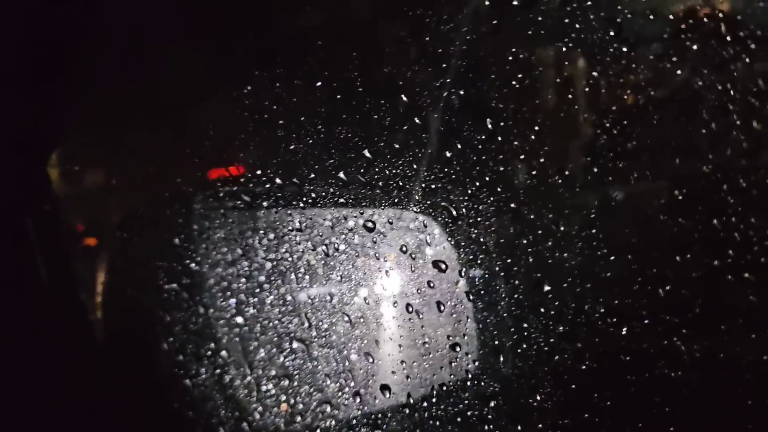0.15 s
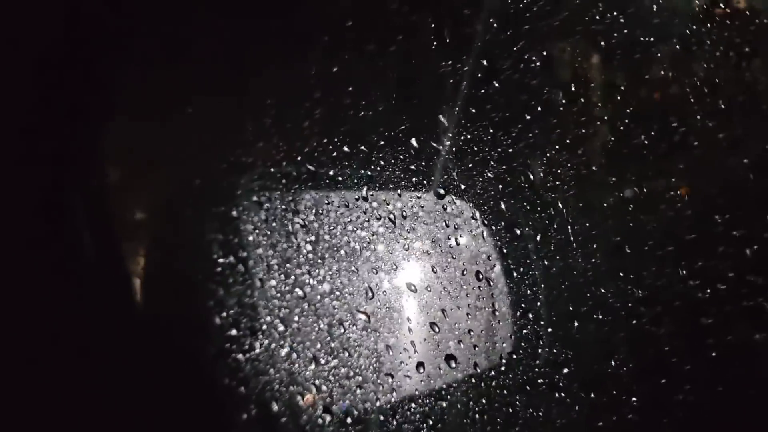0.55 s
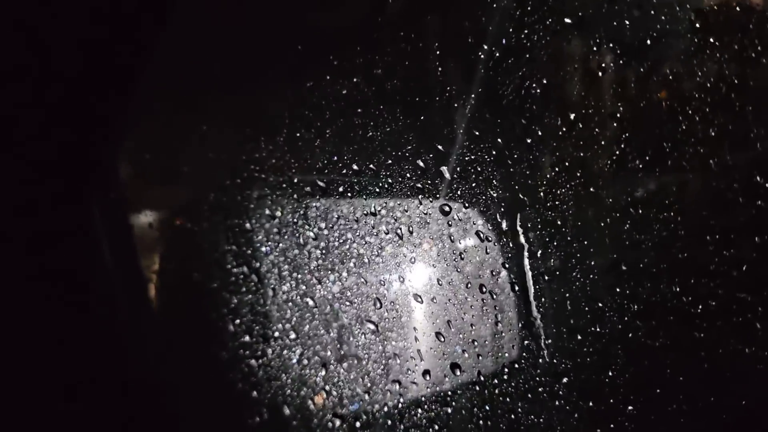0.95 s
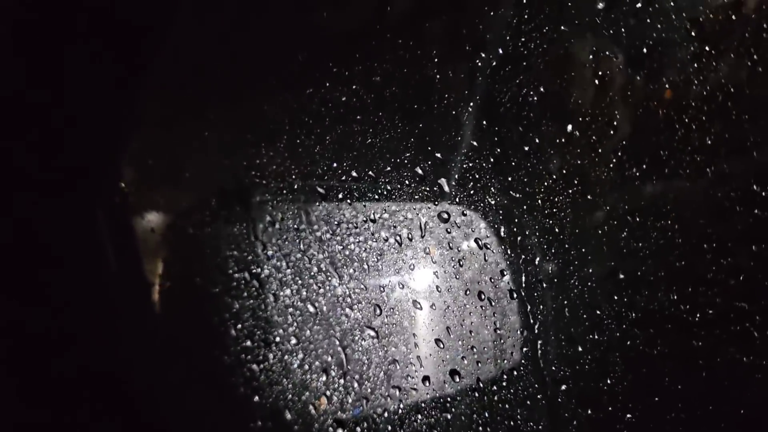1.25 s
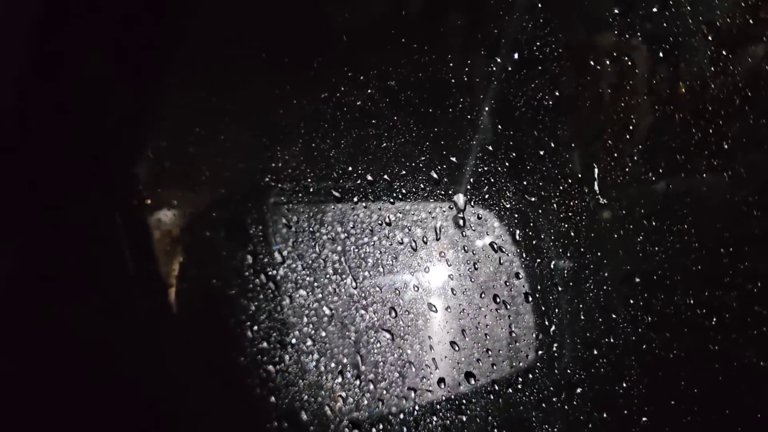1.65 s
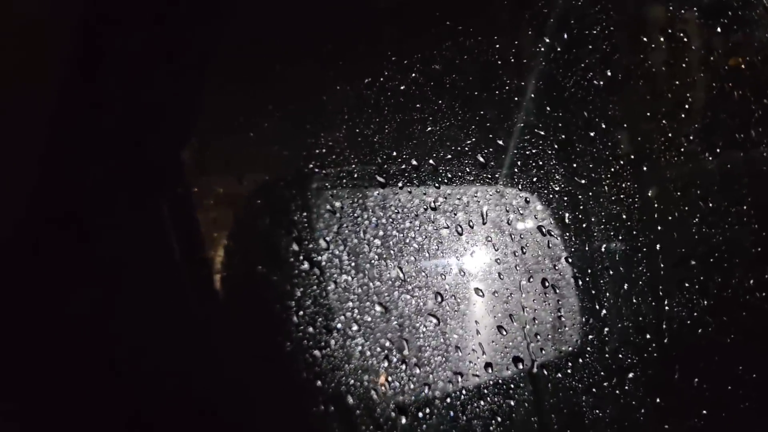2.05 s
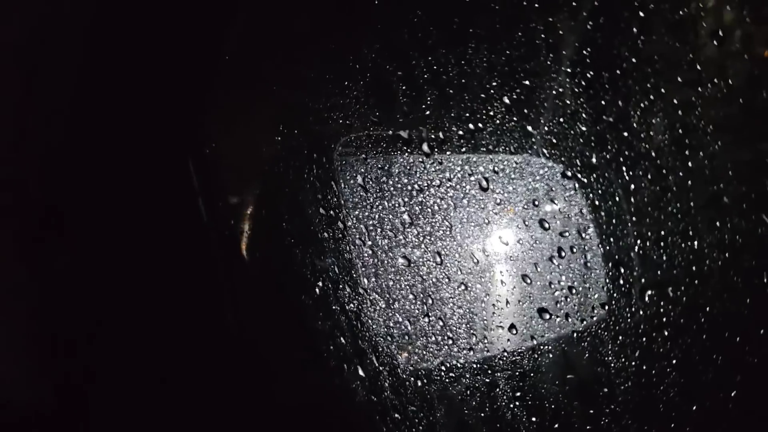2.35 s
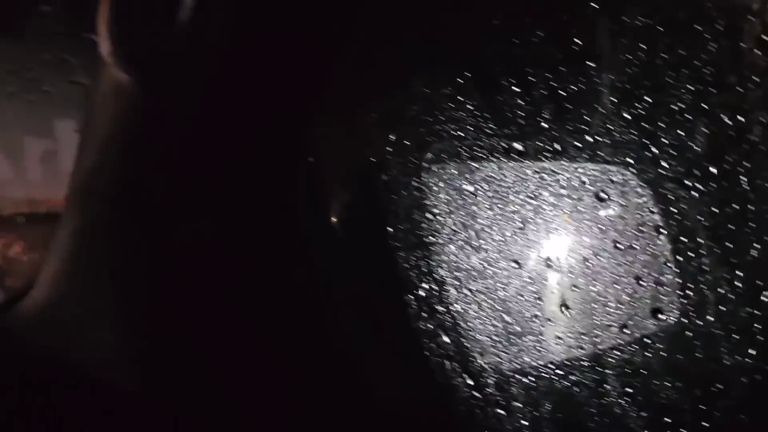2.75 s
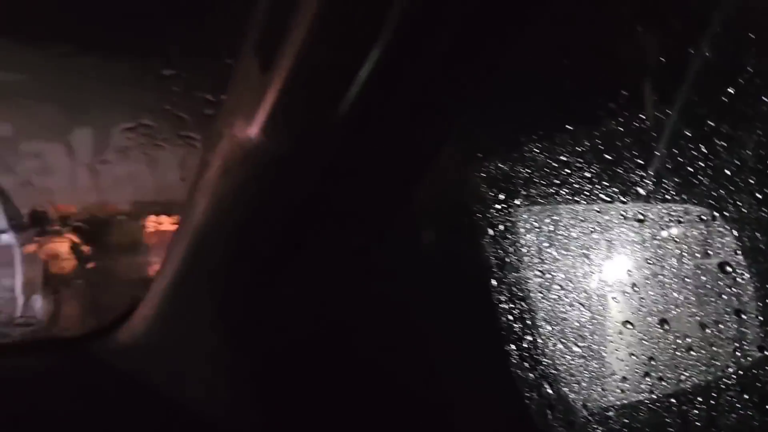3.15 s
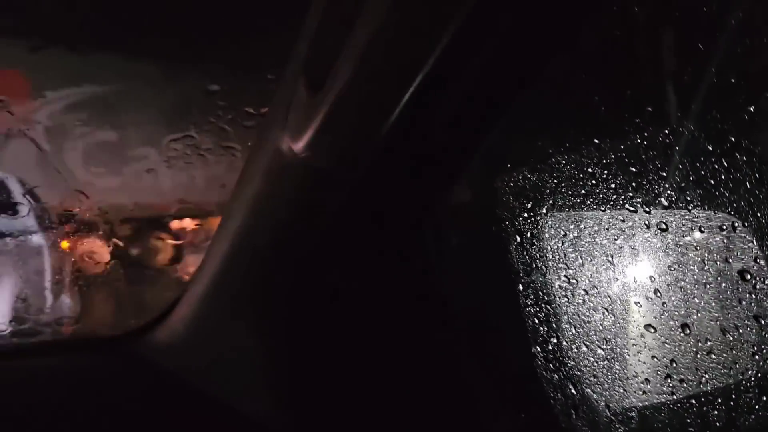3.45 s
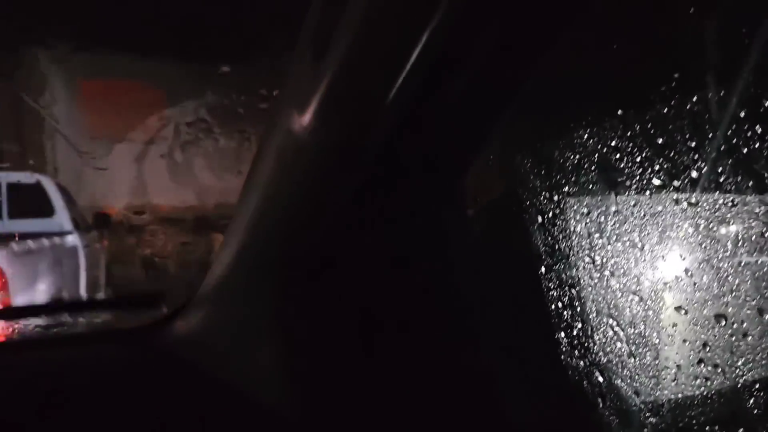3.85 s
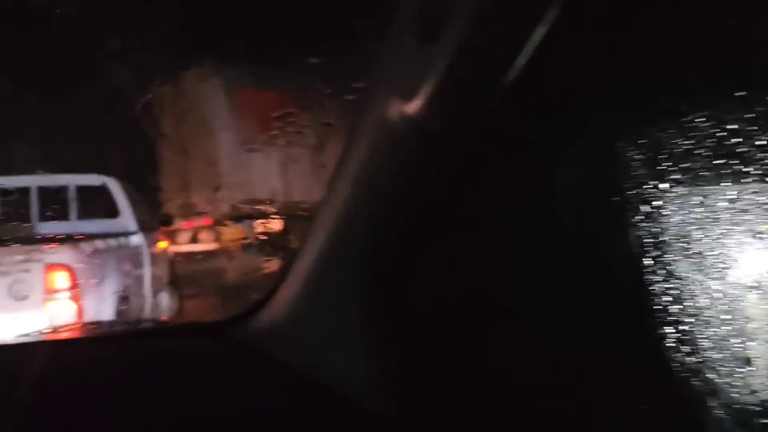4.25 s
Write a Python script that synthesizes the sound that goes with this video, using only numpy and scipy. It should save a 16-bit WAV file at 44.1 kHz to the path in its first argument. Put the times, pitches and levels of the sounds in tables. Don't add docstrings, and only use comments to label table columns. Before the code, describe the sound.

Inside a slow car in rain, heard close through a phone's two microphones. A dense, dull wash of drops runs throughout, mostly low and middle tones with little treble; the right side has more hollow metallic door pings, the left slightly brighter glass ticks and spray. Beneath lie deep tyre rumble, soft floor thuds and a low steady engine hum. At 0.2-0.35 s a faint wet rubber squeak stutters on the left. The low body rumble dips briefly near 0.9 s; a thud lands at 1.2 s. At 2.1 s there is a tiny click from lost samples, then a lorry's very low exhaust boom swells around 2.2, 2.7, 2.9, 3.15, loudest at 3.35, then 3.55 and 3.9 s, with droning floor resonances. Rain is heaviest about 3.25 s, with crowded pings until the end at 4.4 s. Small plopping drips occur near 2.1, 2.4, 2.7, 3.8 and 4.15 s.

```python
import sys
import numpy as np
from scipy import signal
from scipy.fft import rfft, irfft, next_fast_len
from scipy.io import wavfile
from scipy.ndimage import uniform_filter1d, minimum_filter1d

SR = 44100
rng = np.random.default_rng(int(sys.argv[2]) if len(sys.argv) > 2 else 0)


def volts_from_db(level):
    exponent = np.asarray(level, float) / 20
    return 10 ** exponent


def store_pcm(level_fs):
    pcm = np.round(np.clip(level_fs, -1, 1) * 32767).astype(np.int16)
    wavfile.write(sys.argv[1], SR, np.atleast_2d(pcm).T)


N = 194098
T = np.arange(N) / SR

# frequency_hz, left_db, right_db, shared_fraction (0-1)
PORT_SPECTRUM = [(199, -53.5, -52.5, 0.91), (387, -57, -54.5, 0.44), (792, -59.5, -58.5, 0.53),
                 (947, -58, -48.5, 0.24), (1280, -60, -45.5, 0.49), (1500, -61, -54, 0.24),
                 (2024, -66, -65, 0.4), (2330, -69.5, -73.5, .2), (3440, -70.5, -82, 0.3),
                 (4350, -75, -100.5, 0), (4680, -76, -100, 0), (5470, -86.5, -112, 0.6),
                 (7840, -104, -119, 0), (8100, -135, -135, .2)]
PORT_LAG_SAMPLES = 27
# time_s, level_db (relative)
RAIN_INTENSITY = [
    (0.0, -0.5),
    (0.55, 0),
    (1.3, 0.5),
    (1.65, 0),
    (2.45, 0.5),
    (3.25, 4),
    (3.62, 2),
    (3.85, 3),
    (4.15, 1.5),
    (4.4, 3),
]
ROOF_DB, PANEL_DB, GLASS_DB, SPRAY_DB = -1, -3.5, -1.74, -9
ROOF_SLOPE, PANEL_SLOPE, GLASS_SLOPE, SPRAY_SLOPE = 0.12, 0.56, 0.11, 0.44
SPRAY_PATCH_DB, SPRAY_PATCHES_PER_S = 1.6, 18
# peak_s, level_db
WATER_SHEETS = [(0.022, 3), (0.06, -3.5), (0.105, -0.5), (0.32, 4.5), (0.355, -1), (0.905, 3), (0.968, -5),
                (1.5, 4), (1.59, 2.5), (1.624, 1), (1.69, 7), (1.95, 6.5), (1.98, -1.5), (2.019, 5),
                (2.06, 3), (2.09, 5), (2.34, 3), (2.47, 7), (2.51, -2), (3.165, 3.5), (3.22, 4.5),
                (3.28, 3), (3.12, 1.5), (3.33, 2), (4.1, -5), (4.34, -5.5), (4.395, 2.5)]
SHEET_RISE_S, SHEET_FALL_S = 0.014, 0.013
# peak_s, level_db
PANEL_BURSTS = [(0.04, 2.5), (0.76, 5.5), (0.92, -1), (3.242, -3.5), (1.68, 5.5), (2.52, -1), (2.72, 0),
                (2.775, -4), (2.82, 1), (3.165, 3), (3.239, 8.5), (3.255, -2), (3.31, 2.5), (3.475, 0.5),
                (3.5, -2), (3.535, 0), (3.8, -1), (3.925, -1), (4.33, 1)]
BURST_RISE_S, BURST_FALL_S = 0.038, 0.019

# frequency_hz, density_db (per Hz)
ROAD_SPECTRUM = [(11, -22), (18, 3), (41, 4.5), (70, -11.5), (133, -3.5), (181, -8.5), (215, -12.5),
                 (338, -30), (375, -14.5), (400, -31), (520, -43), (880, -120)]
# centre_s, level_db, length_s
TARMAC_PATCHES = [(0.0, 0, 0.057), (0.5, 3.5, 0.11), (0.76, -1, 0.11), (0.894, 2.5, 0.029),
                  (0.975, -8, 0.023), (1.04, 5, 0.025), (1.193, 2.5, 0.062), (1.828, -7, 0.07),
                  (1.896, 3, .03), (1.996, -10, 0.037), (2.135, 3, 0.23), (2.697, 2.5, 0.11),
                  (2.967, 3.5, 0.049), (3.133, -8, 0.042), (3.237, 5, 0.12), (3.56, -9, 0.04),
                  (3.755, -6.5, 0.026), (3.91, -2, 0.077), (3.998, -4.5, 0.028), (4.14, -2.5, 0.042),
                  (4.4, 3, 0.11)]
# peak_s, level_db, pitch_hz
FLOOR_THUDS = [(0.03, -26, 137), (0.04, -26.5, 88.4), (0.13, -23, 126.5), (0.26, -26, 151.7),
               (0.37, -27.5, 78), (0.46, -29.5, 170), (0.48, -40, 245), (0.53, -23.5, 135),
               (0.72, -29.5, 170), (0.89, -26, 186.7), (1.06, -27, 122.5), (1.08, -31, 77.5),
               (1.12, -27.5, 167), (1.2, -20, 86.6), (1.34, -28, 152), (1.49, -26.5, 177), (1.6, -31, 175),
               (1.75, -29, 143), (1.89, -25, 133.4), (2.05, -26, 157), (2.11, -28, 114), (2.28, -28, 111),
               (2.53, -28, 114.5), (2.65, -26.5, 180.7), (2.68, -28.5, 144), (3.24, -28, 167),
               (3.8, -27, 196), (3.92, -26.5, 174.3), (4.24, -25.5, 184), (2.2, -26, 155), (2.1, -30, 123),
               (2.71, -26, 98.4), (2.97, -24.5, 96.4), (3.32, -17.5, 99), (3.1, -32, 191)]
# centre_s, level_db, length_s
SPRING_LULLS = [
    (0.866, -14, 0.21),
]
TYRES_DB = -26
SPRINGS_DB, SPRINGS_AFTER_DB, SETTLE_DB_PER_S = -24, -29.5, 3
JOLT_S, LORRY_NEAR_S = 0.9, 2.1

ENGINE_HZ, ENGINE_DB = 31.16, -27
# multiple of ENGINE_HZ, level_db
ENGINE_ORDERS = [(1, -1.5), (2, -7), (5, -17), (6, -15)]

# peak_s, level_db, pitch_hz
DOOR_RINGS = [(0.016, -26.5, 1130), (0.034, -19.5, 1174), (0.77, -24, 1250), (1.013, -19.5, 1250),
              (1.591, -18, 1176), (1.625, -20.5, 1290), (1.678, -16.5, 1264), (1.733, -19.5, 1147),
              (2.013, -25, 1134), (2.255, -27, 1470), (2.286, -20.5, 1154), (2.345, -24, 1220),
              (2.476, -27, 943), (2.637, -27, 1320), (2.637, -22, 930), (2.659, -22, 1170),
              (2.681, -26, 1207), (2.709, -27, 1305), (2.821, -29, 1450), (2.824, -21.5, 1006),
              (2.979, -29, 1039), (3.016, -21, 1180), (3.029, -20, 957), (3.11, -28, 1020),
              (3.159, -33, 1180), (3.172, -26, 1470), (3.187, -18, 1256), (3.231, -24, 1000),
              (3.253, -18.5, 1394), (3.302, -22, 987), (3.309, -20, 1315), (3.318, -34, 1160),
              (3.349, -23, 1250), (3.423, -25, 1160), (3.464, -27, 1130), (3.479, -19.5, 1284),
              (3.479, -22, 986), (3.529, -24.5, 984), (3.532, -22, 1280), (3.585, -21, 1280),
              (3.585, -31, 1110), (3.753, -29, 980), (3.759, -26, 1380), (3.799, -22.5, 973),
              (3.799, -19.5, 1250), (3.837, -26, 1000), (3.914, -19.5, 1173), (3.93, -20, 980),
              (3.93, -27, 1325), (3.939, -29, 1170), (4.063, -22, 995), (4.085, -19.5, 1275),
              (4.132, -17.5, 1224), (4.188, -24.5, 996), (4.225, -20, 1036), (4.312, -14.5, 1286),
              (4.337, -27, 954), (4.34, -21.5, 1270), (4.374, -30, 1286)]
DOOR_RINGS_MORE = [(0.292, -27, 1430), (0.304, -30, 1540), (0.345, -23.5, 1340), (0.345, -27, 1196),
                   (0.413, -26, 1490), (0.537, -27.5, 1306), (0.659, -23.5, 1455), (0.885, -22, 1170),
                   (0.898, -24.5, 1450), (0.91, -24, 1090), (1.177, -25, 1320), (1.236, -25, 896),
                   (1.404, -24, 1110), (1.476, -23, 1270), (1.494, -23, 1150), (1.541, -20.5, 1110),
                   (1.709, -22.5, 1394), (1.789, -28, 1210), (1.83, -27, 1265), (1.886, -23, 1306),
                   (1.951, -33.1, 1620), (1.954, -30.5, 1470), (2.053, -35, 1140), (2.255, -26, 1380),
                   (2.258, -22, 1040), (2.398, -26, 1470), (2.436, -24.5, 1340), (2.473, -27, 1500),
                   (2.606, -28.5, 1460), (2.793, -29.5, 1200), (2.824, -29, 1690), (2.864, -29, 1580),
                   (2.933, -32, 1270), (3.178, -23.5, 990), (3.194, -28, 1120), (3.231, -33.5, 1134),
                   (3.299, -33, 1510), (3.395, -32, 1100), (3.405, -28, 945), (3.427, -24, 910),
                   (3.541, -28, 1300), (3.557, -24, 1280), (3.594, -37, 1370), (3.597, -26, 980),
                   (3.653, -27, 995), (3.709, -24, 1005), (3.743, -26, 1180), (3.812, -24, 1406),
                   (3.843, -29.5, 1420), (3.924, -34, 1670), (4.004, -32, 1764), (4.026, -21, 1225),
                   (4.166, -22.5, 950), (4.169, -29, 1220), (4.203, -32, 1500), (4.228, -22.5, 1420),
                   (4.25, -22, 1280), (4.259, -25, 1160), (4.349, -29, 1440), (4.359, -37, 1117)]
DOOR_LEFT_DB, RING_RISE_S, RING_FALL_S = -20, 0.007, 0.0099
# peak_s, level_db,
# pitch_hz
ROOF_KNOCKS = [(0.052, -25.5, 393), (0.34, -30, 283), (0.625, -30, 580), (0.636, -31, 324), (0.7, -29, 480),
               (0.902, -28, 383), (1.171, -27.5, 408), (1.194, -26.5, 283), (1.695, -29.5, 290),
               (2.054, -29, 287), (2.073, -33, 406), (2.178, -30.5, 358), (2.222, -28, 346),
               (2.466, -32.5, 494), (2.514, -31, 281.5), (2.634, -29, 590), (2.668, -28, 535),
               (2.698, -28.5, 825.7), (2.735, -35.7, 664), (2.986, -30.5, 592), (3.042, -33, 430),
               (3.18, -30.5, 807), (3.203, -29, 594), (3.266, -27.5, 816), (3.266, -30.5, 585),
               (3.293, -28.5, 520), (3.304, -30.5, 816), (3.304, -34, 690), (3.423, -33.5, 660),
               (3.457, -31, 584), (3.476, -30, 733), (3.786, -32.5, 810), (3.805, -35, 584),
               (3.921, -30, 806), (3.951, -31, 740), (4.318, -29.5, 600), (4.318, -32, 350),
               (4.34, -36.9, 770), (4.374, -32, 813)]
ROOF_KNOCKS_MORE = [(0.037, -30, 800), (0.176, -28, 263), (0.483, -29, 264), (0.535, -33, 408),
                    (0.703, -31, 656), (0.861, -37, 503), (0.947, -35, 650), (1.044, -30, 237),
                    (1.078, -40, 387), (1.115, -34, 285), (1.216, -37, 391), (1.384, -29, 362),
                    (1.411, -34, 341), (1.564, -37.5, 391), (1.583, -32, 577), (1.586, -33, 248),
                    (1.725, -31, 480), (1.777, -27, 253), (1.886, -32, 318), (2.163, -36, 540),
                    (2.249, -31, 478), (2.267, -33, 620), (2.421, -33, 320), (2.593, -34, 565),
                    (2.724, -36, 410), (2.836, -31.5, 720), (2.851, -31, 483), (3.352, -36, 333),
                    (3.465, -31.5, 420), (3.465, -40, 306), (3.588, -31, 730), (3.588, -32.5, 623),
                    (3.607, -28.5, 352), (3.846, -34, 610), (3.899, -36.5, 633), (3.925, -31, 730),
                    (4.089, -33, 600), (4.179, -33, 635), (4.183, -42, 530), (4.389, -33, 640)]
# peak_s, level_db, pitch_hz
SEAL_WHISTLES = [(2.279, -80.5, 8558), (2.279, -87, 8166), (2.297, -74, 8783), (2.323, -87, 8000),
                 (2.323, -69, 7525), (2.323, -89, 7891), (2.574, -76.5, 8550), (2.597, -88.8, 7983),
                 (2.615, -88.5, 8200), (3.191, -79.7, 8775), (3.21, -80, 8150), (3.483, -80, 8341),
                 (3.502, -75.5, 8125), (3.551, -82.1, 8133), (3.992, -88.3, 7966), (4.033, -64.5, 7366),
                 (4.176, -75, 8375)]
# peak_s, level_db, pitch_hz
RUBBER_CATCHES = [
    (.192, -36, 2350),
    (.222, -44, 2140),
    (.24, -42, 2400),
    (.25, -42, 2250),
    (.265, -40, 2420),
    (.31, -48, 2150),
    (.333, -41, 2400),
    (.542, -40, 3400),
]
# peak_s, level_db, pitch_hz
WINDOW_TICKS = [(0.0802, -38, 3150), (0.4299, -29, 2850), (0.5392, -31, 3360), (0.8999, -30, 2380),
                (0.9747, -34, 2880), (1.1922, -38, 2650), (1.3843, -29, 3400), (1.6457, -28, 2830),
                (1.733, -31, 2530), (1.9375, -30, 3250), (2.2702, -24, 2340), (2.3974, -33, 3310),
                (2.4648, -34, 2420), (2.5556, -32, 2910), (2.7931, -34, 3400), (3.0924, -29, 3330),
                (3.158, -27, 3130), (3.2186, -29, 3200), (3.454, -34, 2760), (4.1101, -37, 2550),
                (4.2238, -30, 2610), (4.2857, -26, 2300)]
TICK_DB = -10

SQUEAK_S, SQUEAK_LENGTH_S, SQUEAK_DB, SQUEAK_SAG_DB_PER_S = 0.185, 0.16, -47, 25

# peak_s, level_db, rise_s, fall_s
EXHAUST_SURGES = [
    (2.2, -16.5, 0.12, 0.28),
    (2.5, -23, 0.12, 0.16),
    (2.711, -12, 0.06, 0.052),
    (2.93, -14, 0.06, 0.17),
    (3.16, -13, 0.064, 0.074),
    (3.349, -10.5, 0.083, 0.1),
    (3.56, -15.5, 0.13, 0.13),
    (3.9, -16.5, 0.062, 0.087),
    (4.04, -25.5, 0.025, 0.057),
]
FIRING_HZ, CRUISE_HZ, SLOWING_HZ_PER_S = 51.85, 43.9, 7.8
OVERTONE_DB, OVERTONE_SLOPE, OVERTONE_SHORTER = -18.5, 1.7, 0.5
# start_s, length_s, start_hz,
# end_hz, level_db
RESONANCE_SWELLS = [
    [(2.07, 0.16, 211, 201.1, -28.5), (2.25, 0.3, 200.4, 199.4, -27.5), (2.65, 0.32, 197.3, 201.6, -26.5),
     (3.0, 0.1, 196.8, 199, -25)],
    [(3.606, 0.21, 193.7, 193.8, -31)],
    [(1.673, 0.21, 130, 130.8, -28.5)],
    [(3.21, 0.072, 128.1, 123.7, -22.5), (3.32, .38, 126.5, 125.2, -25)],
    [(3.85, 0.181, 110, 129.8, -27.5), (4.03, 0.1, 127.7, 114.7, -25), (4.16, 0.075, 110.2, 107, -22),
     (4.3, 0.04, 109, 106.4, -21)],
]

# time_s, level_db
TRIM_DRIPS = [
    (2.121, -31.5),
    (2.421, -30.5),
    (2.72, -28.5),
    (3.786, -27),
    (4.151, -27.5),
]
# delay_s, level_db, pitch_hz
TRIM_MODES = [(.003, -1, 1430), (.006, 0.5, 1683), (.009, -8, 1890), (.011, -10, 2080)]

# level_db, one row per port
TOP_HISS_DB = [
    [-68.5],
    [-81],
]
# time_s, left_jump, right_jump (full scale 1)
LOST_SAMPLES = [
    (2.10993, .235, .225),
    (2.11079, -.08, 0),
]
LIMIT, LIMIT_S = 0.88, 0.006


def unit(x):
    return x / np.sqrt(np.mean(x ** 2))


def on_log(hz, points, values):
    return np.interp(np.log(hz + 1), np.log(points), values)


def band(x, lo_hz, hi_hz):
    size = next_fast_len(N)
    octave = np.log2(np.fft.rfftfreq(size, 1 / SR) + 1)
    low_edge, high_edge = [np.clip((octave - np.log2(f)) * 3 + .5, 0, 1) * np.pi / 2 for f in (lo_hz, hi_hz)]
    return irfft(rfft(x, size) * np.sin(low_edge) * np.cos(high_edge), size)[..., :N]


def walk(rate):
    k = int(SR / rate)
    held = rng.standard_normal(512)[np.arange(N) // k]
    return 0.99 * uniform_filter1d(uniform_filter1d(held, k), k)


def tone(hz, wobble=0.):
    turns = np.cumsum(hz) / SR + rng.random()
    return np.sqrt(2) * np.sin(2 * np.pi * turns + wobble)


def swell(s, rise_s, fall_s):
    return np.exp(-((T - s) / np.where(T < s, rise_s, fall_s)) ** 2)


def gate(start_s, end_s, fade=.04):
    return np.clip(np.minimum(T - start_s, end_s - T) / fade + .5, 0, 1)


def knocks(rows, rise_s, fall_s, left_db, right_db, bend):
    out = np.zeros(N)
    for (s, db, hz), (turn, slide) in zip(rows, rng.standard_normal((64, 2))):
        near = slice(max(int((s - 3 * rise_s) * SR), 0), int((s + 3 * fall_s) * SR))
        t = T[near] - s
        bell = np.exp(-(t / np.where(t < 0, rise_s, fall_s)) ** 2)
        cycles = hz * t * (1 + bend * slide * t / fall_s) + turn
        out[near] += np.sqrt(2) * volts_from_db(db) * bell * np.sin(2 * np.pi * cycles)
    return out * volts_from_db(np.array([[left_db], [right_db]]))


def drops(rate, spread_db, wash):
    pick, size = rng.random(N), rng.exponential(1, N)
    sign, hiss = rng.standard_normal((2, N))
    hits = (pick < rate / SR) * volts_from_db(spread_db * np.minimum(size, 4.5)) * np.sign(sign)
    smear = rfft(rng.standard_normal(600) * np.exp(-np.arange(600) / (.0015 * SR)), N)
    all_pass = smear / np.abs(smear)
    return unit(irfft(rfft(hits) * all_pass, N)) + wash * hiss


def rain():
    fall_db = np.interp(T, *np.transpose(RAIN_INTENSITY))
    sheet_db = sum(db * swell(s, SHEET_RISE_S, SHEET_FALL_S) for s, db in WATER_SHEETS)
    burst_db = sum(db * swell(s, BURST_RISE_S, BURST_FALL_S) for s, db in PANEL_BURSTS)

    hz, left_db, right_db, share = np.transpose(PORT_SPECTRUM)
    f = np.fft.rfftfreq(N, 1 / SR)
    share = np.clip(on_log(f, hz, share), 0, 1)
    early = np.exp(2j * np.pi * f * PORT_LAG_SAMPLES / SR * (f > 900))
    both, left, right = (rfft(unit(drops(rate=1800., spread_db=3.0, wash=1.125))) for _ in range(3))
    left_port = volts_from_db(on_log(f, hz, left_db)) * (np.sqrt(share) * both * early + np.sqrt(1 - share) * left)
    right_port = volts_from_db(on_log(f, hz, right_db)) * (np.sqrt(share) * both + np.sqrt(1 - share) * right)
    x = irfft(np.array([left_port, right_port]), N) * np.sqrt(SR / 2)

    gust = 1.7 * walk(18)
    roof_db = ROOF_DB + ROOF_SLOPE * fall_db + 0.2 * burst_db + 1.0 * gust + 0.23 * walk(25)
    panel_db = PANEL_DB + PANEL_SLOPE * fall_db + 0.6 * burst_db + 0.43 * gust + 0.19 * walk(25)
    glass_db = GLASS_DB + GLASS_SLOPE * fall_db + sheet_db + 0.17 * gust + 0.2 * walk(8.5)
    roof = band(x, 0.76, 779) * volts_from_db(roof_db)
    panels = band(x, 826, 2090) * volts_from_db(panel_db)
    glass = band(x, 2200, 4490) * volts_from_db(glass_db)

    edges_hz = (4600, 5400, 6300, 20000)
    patches = sum(band(x, lo, hi) * volts_from_db(SPRAY_PATCH_DB * walk(SPRAY_PATCHES_PER_S))
                  for lo, hi in zip(edges_hz, edges_hz[1:]))
    spray = volts_from_db(SPRAY_DB + SPRAY_SLOPE * fall_db + sheet_db) * patches
    return roof + panels + glass + spray


def road():
    colour = volts_from_db(on_log(np.fft.rfftfreq(N, 1 / SR), *np.transpose(ROAD_SPECTRUM)))
    mid, side = irfft(rfft(rng.standard_normal((2, N))) * colour, N)
    x = mid + 0.088 * side * np.array([[1], [-1]])

    lull_db = sum(db * swell(s, n, n) for s, db, n in SPRING_LULLS)
    sway_db = SPRINGS_DB - SETTLE_DB_PER_S * np.maximum(T - JOLT_S, 0) + lull_db
    before = gate(-1, LORRY_NEAR_S, fade=0.079)
    springs = volts_from_db(sway_db * before + SPRINGS_AFTER_DB * (1 - before)) * unit(band(x, 40, 65))

    tarmac_db = sum(db * swell(s, n, n) for s, db, n in TARMAC_PATCHES)
    tyres = volts_from_db(TYRES_DB + tarmac_db) * unit(band(x, 72, 2000))
    thuds = knocks(FLOOR_THUDS, 0.037, 0.04, 0., 0., .02)
    deep_rumble = volts_from_db(-37) * unit(band(x, 5, 28))
    return springs + tyres + thuds + deep_rumble


def engine():
    hz = np.full(N, ENGINE_HZ)
    return sum(volts_from_db(ENGINE_DB + db + .7 * k * walk(5)) * tone(k * hz, .12 * k * walk(4)) for k, db in ENGINE_ORDERS)


def door_ring():
    door = knocks(DOOR_RINGS, RING_RISE_S, RING_FALL_S, DOOR_LEFT_DB, 0., 0.017)
    door_more = knocks(DOOR_RINGS_MORE, 0.0077, 0.01, DOOR_LEFT_DB, 0., 0.023)
    roof = knocks(ROOF_KNOCKS, 0.01, 0.012, -2.5, 0.67, .03)
    roof_more = knocks(ROOF_KNOCKS_MORE, 0.013, 0.01, -1.7, 0.71, .03)
    whistles = knocks(SEAL_WHISTLES, 0.017, 0.02, 0., -15.0, .001)
    catches = knocks(RUBBER_CATCHES, 0.0052, .008, 0., -11.0, 0.0074)
    return door + door_more + roof + roof_more + whistles + catches


def ticks():
    return volts_from_db(TICK_DB) * knocks(WINDOW_TICKS, .0006, 0.0015, 3.4, -7.0, 0.028)


def squeak():
    end_s = SQUEAK_S + SQUEAK_LENGTH_S
    db = SQUEAK_DB - SQUEAK_SAG_DB_PER_S * np.clip(T - SQUEAK_S, 0, SQUEAK_LENGTH_S)
    f = np.fft.rfftfreq(N, 1 / SR)
    resonances = sum(1 / (1 + ((f - hz) / 50) ** 2) for hz in (2130, 2370))
    rub = unit(irfft(rfft(rng.standard_normal(N)) * resonances, N))
    return gate(SQUEAK_S, end_s, fade=.015) * volts_from_db(db) * rub * volts_from_db(np.array([[7], [-3]]))


def strand(notes):
    start, length, from_hz, to_hz, db = np.transpose(notes)
    hz = np.interp(T, np.ravel([start, start + length], "F"), np.ravel([from_hz, to_hz], "F"))
    level = sum(volts_from_db(d) * gate(s, s + n, fade=0.049) for s, n, d in zip(start, length, db))
    waver = walk(7.8)
    return level * volts_from_db(0.67 * walk(19)) * tone(hz, 0.75 * waver)


def lorry():
    hz = np.maximum(FIRING_HZ - SLOWING_HZ_PER_S * (T - LORRY_NEAR_S), CRUISE_HZ)
    effort = sum(volts_from_db(db) * swell(s, rise, fall) for s, db, rise, fall in EXHAUST_SURGES)
    bark = sum(volts_from_db(OVERTONE_DB + OVERTONE_SLOPE * (db + 9.5))
               * swell(s, OVERTONE_SHORTER * rise, OVERTONE_SHORTER * fall)
               for s, db, rise, fall in EXHAUST_SURGES)
    boom = effort * tone(hz, 0.18 * walk(10)) + bark * tone(2 * hz, 0.52 * walk(8))
    return boom + sum(map(strand, RESONANCE_SWELLS))


def drips():
    out = 0
    for late, mode_db, hz in TRIM_MODES:
        hits = [(s + late, db + mode_db, hz) for s, db in TRIM_DRIPS]
        out = out + knocks(hits, 0.0061, 0.0076, -5.0, 3.5, .02)
    return out


def scene():
    bass = (road() + engine() + lorry()) * volts_from_db(np.array([[.3], [-.3]]))
    return rain() + bass + door_ring() + ticks() + squeak() + drips()


def limiter(x):
    size = int(LIMIT_S * SR)
    gain = np.minimum(1, LIMIT / (np.abs(x).max(axis=0) + 1e-9))
    return x * uniform_filter1d(minimum_filter1d(gain, size), size)


def roll_off(x):
    return signal.sosfilt(signal.butter(12, 15720, fs=SR, output="sos"), x)


def record(dry):
    shelf = signal.cheby2(8, 30, 10900, "high", fs=SR, output="sos")
    hiss = signal.sosfilt(shelf, rng.standard_normal((2, N))) * volts_from_db(np.array(TOP_HISS_DB))
    hiss = hiss + volts_from_db(-91) * rng.standard_normal((2, N))
    jump = sum(np.array([[left], [right]]) * np.where(T >= s, .6, -.4) * np.exp(-np.abs(T - s) / 0.002)
               for s, left, right in LOST_SAMPLES)
    mix = limiter(dry) * gate(.002, 10, fade=.004) + hiss + jump
    return roll_off(mix)


dry = scene()
out = record(dry)
store_pcm(out)
```